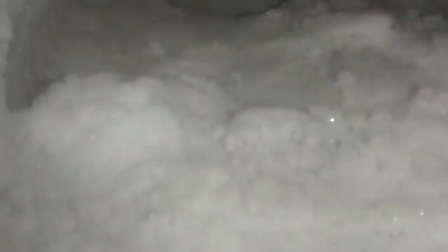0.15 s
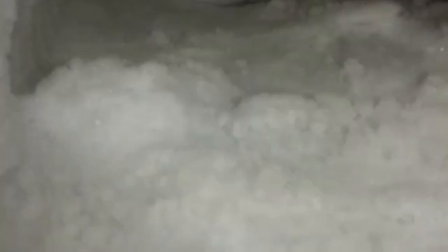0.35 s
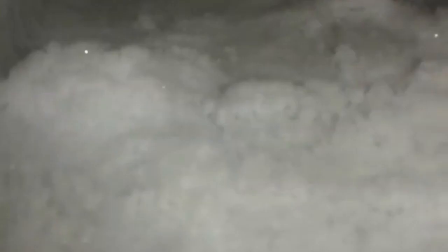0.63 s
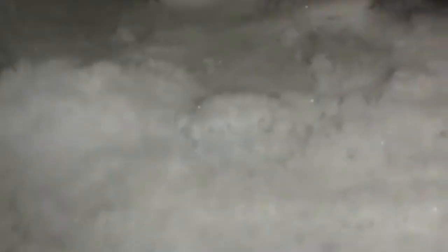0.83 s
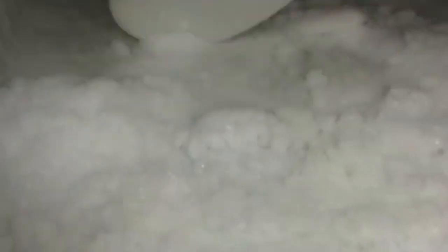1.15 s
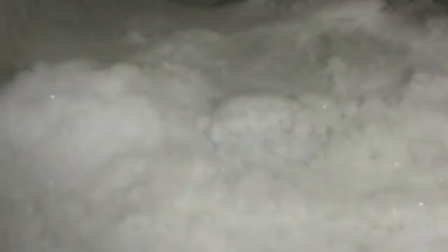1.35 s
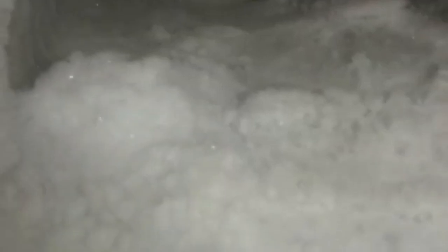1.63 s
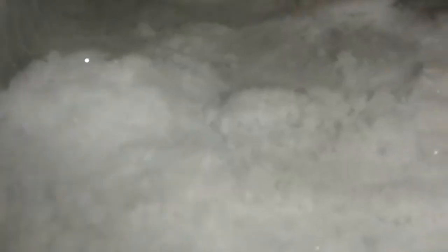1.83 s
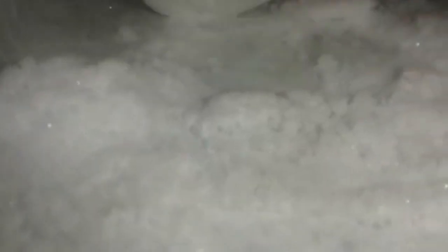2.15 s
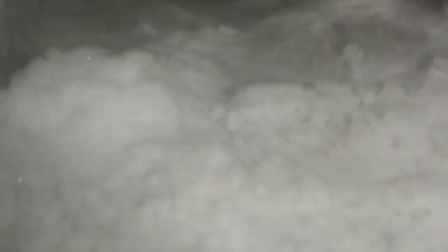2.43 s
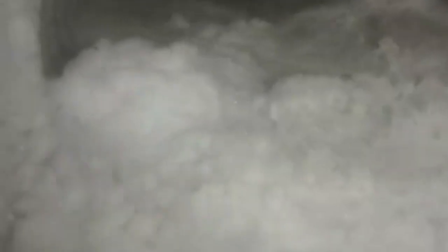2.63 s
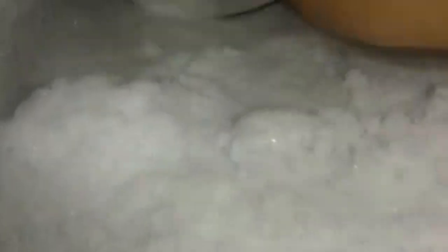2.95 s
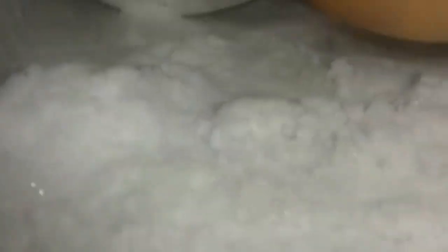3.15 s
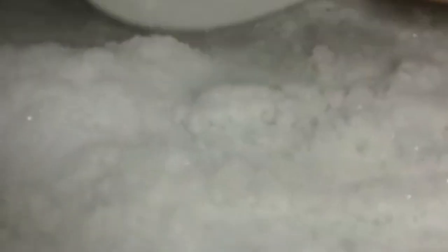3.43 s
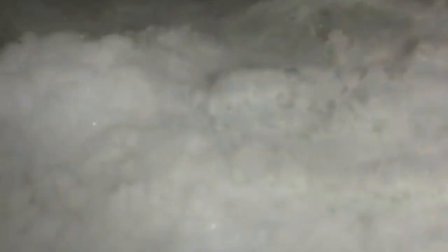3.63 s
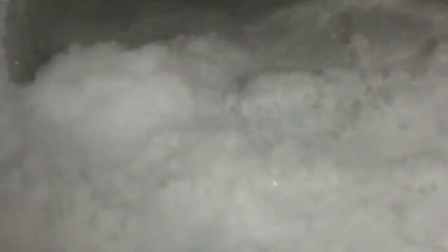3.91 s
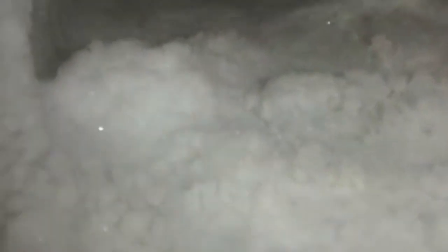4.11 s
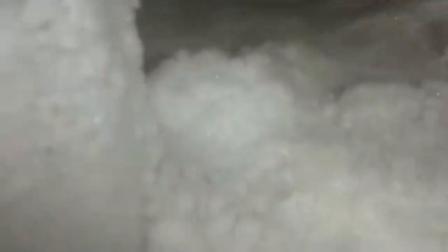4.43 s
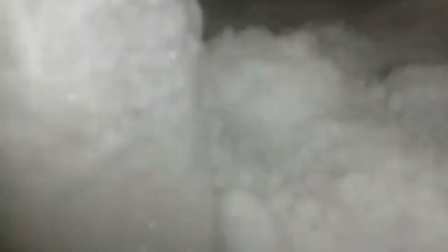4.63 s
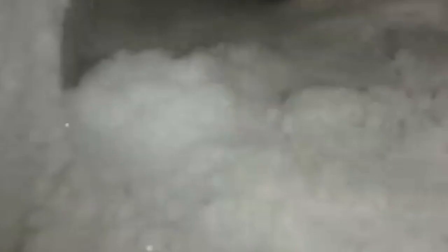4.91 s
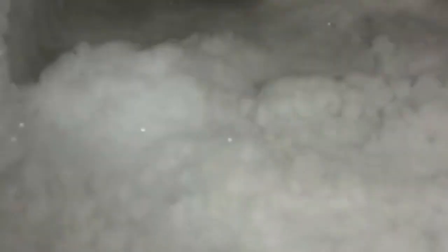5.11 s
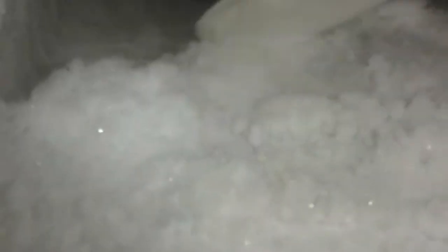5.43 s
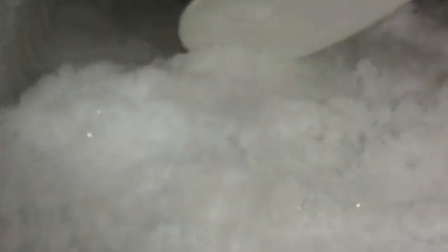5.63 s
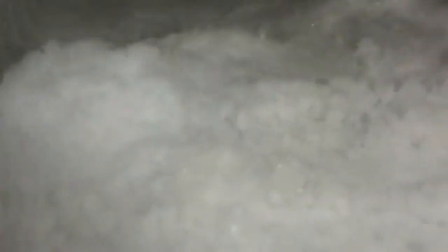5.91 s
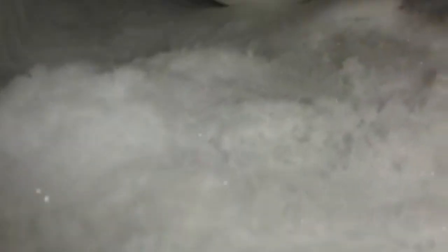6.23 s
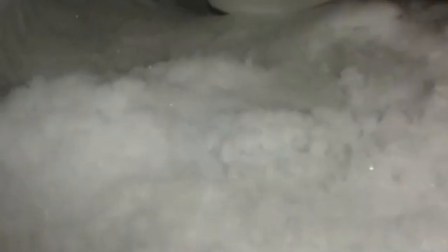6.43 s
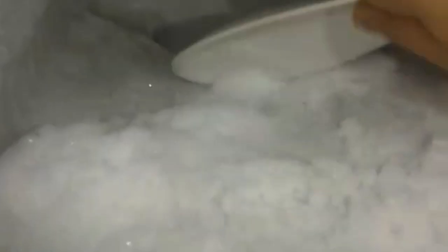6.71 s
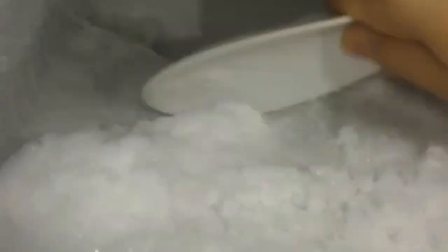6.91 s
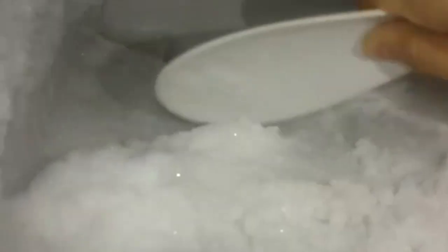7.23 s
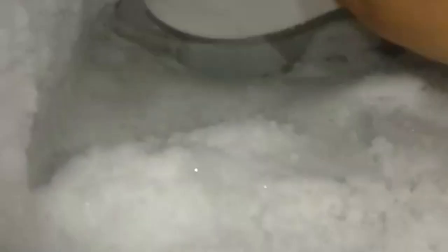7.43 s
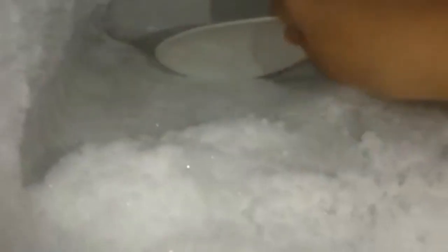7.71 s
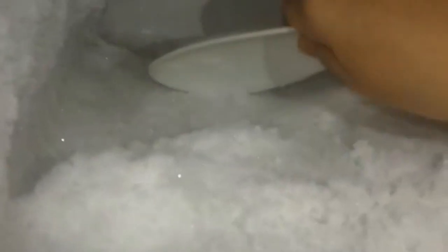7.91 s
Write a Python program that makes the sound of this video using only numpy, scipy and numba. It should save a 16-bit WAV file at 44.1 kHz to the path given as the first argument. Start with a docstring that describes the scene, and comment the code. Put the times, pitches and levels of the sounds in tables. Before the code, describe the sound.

Close inside a freezer, a thin plastic scraper works over thick frost. The tail of one stroke opens the scene, then a light scratch at 0.5 s leads into a gritty rasp from 0.7 to 1.2 s. Another long push runs 1.8-2.3 s, and a longer, rougher one 2.7-3.5 s with loud snaps near 3.0 and 3.2 s and a dull wall thump at its end. A short scrape at 3.9 s precedes a hollow flurry of small cracks from 4.0 to 4.7 s along the side wall. Firm strokes follow at 4.7-5.0 and 5.1-5.7 s. After a pause, jerky, brighter scraping with snaps fills 6.1-6.9 s, then short scratches around 7.0-7.3 s. From 7.7 s a last push crackles, its strongest break near 8.0 s. Crumbs trickle after strokes; low motor hum and rumble persist faintly, while a thin two-tone whistle fades by mid-scene.

```python
"""Scraping frost in a freezer

A thin plastic scraper is pushed over thick frost, stroke after stroke, close to the microphone.
Loose frost rasps as shaped noise; on hard ice the edge sticks, slips and snaps in bursts of fractures.
The freezer wall thumps in its low modes, near walls echo and the kitchen adds a faint tail.
Behind it: a low motor hum over rumble and drone, and a thin two-tone whistle that fades."""
import sys
import numpy as np
from scipy import signal
from scipy.fft import rfft, irfft, next_fast_len
from scipy.io import wavfile
from scipy.ndimage import uniform_filter1d, map_coordinates
from numba import njit

SR = 44100
rng = np.random.default_rng(int(sys.argv[2]) if len(sys.argv) > 2 else 0)


def inscribe(sig):
    """Save sig as 16-bit PCM at rate SR to the path in sys.argv[1].

    A 1-D sig is mono; a 2-D sig holds one channel per row.
    Samples are clipped to [-1, 1] before scaling.
    """
    pcm = np.round(np.clip(np.atleast_2d(sig).T, -1, 1) * 32767)
    wavfile.write(sys.argv[1], SR, pcm.astype(np.int16))


N = 355446
TIME = np.arange(N) / SR
SIZE = next_fast_len(N + SR, True)  # transform length, with room for tails
HZ = np.fft.rfftfreq(SIZE, 1 / SR)
TOP_HZ = 16000  # band limit

# the edge lands or breaks off a lump, levels ahead of the band trims:
# (time [s], middle level [dB], bass and treble relative to it [dB, dB])
SNAP_EVENTS = [(0.4904, -11.5, -9, 0.5), (0.5681, -12.5, -3.5, -2.5), (0.715, -20, 8, 12),
               (1, -3, -5.5, -17), (1.6133, -15, -4.5, 1), (1.765, -9, -6.5, -15), (2.6415, -20, 4, 16.5),
               (2.9744, 2.5, -10.5, -41), (3.2012, -2, -15, -1.5), (3.4993, -14, 4.5, 3),
               (4.006, -17, -7, 8.5), (4.0432, -16, -14, -2), (4.068, -8.5, -17, -20),
               (4.117, -9.5, -13, -5), (4.1822, -15.5, -18, 2.5), (4.2121, -11, -14, -3.5),
               (4.2622, -10.5, -4.5, 1), (4.3375, -11, -15, -6), (4.4429, -9.5, -2, -1.5),
               (4.5084, -10.5, -13, -11), (4.561, -19.5, -9, -1), (4.5942, -12.5, -11, -6.5),
               (4.6416, -21, -18, -6), (4.7239, -9, 1.5, -5), (5.0402, -9.5, -10, 0),
               (5.0689, -10.5, -9, -2.5), (5.1277, -7.5, -12, -4), (5.5009, -11.5, 3, -3),
               (5.5396, -11, 7.5, -20), (6.0835, -6, 4, -6), (6.127, -5, -14, -12),
               (6.1646, -3.5, -26, -7.5), (6.2249, -7, -17, -4), (6.3395, -2, -32, -7.5),
               (6.4752, -9.5, -22, -8), (6.8761, -8.5, -5, 5), (6.981, -18, -9, 8), (7.1742, -9.5, -19, 1),
               (7.2044, -10, -0.5, 3), (7.6881, -19, -8, 4), (7.8531, -7, -22, 0), (7.896, 0, -12, -4),
               (7.9405, 1.5, -14, -5.5), (7.985, -5, -2.5, -15), (8.0249, 10, -14, -4),
               (8.0456, -3, -13, 3)]
# pushes of the scraper: (start [s], end [s], level [dB], rise [s], bass and treble relative to it [dB, dB],
# stick-slip share [0-1], dig down to hard ice [0-1], lower and upper blade mode in mid-stroke [Hz, Hz])
PUSHES = [(-0.1, 0.1, -16, 0.025, -9.5, 3.5, 0.055, 0.39, 1470, 4150),
          (0.54, 0.684, -25.5, 0.063, -7.5, 1, 0.63, 0, 1770, 5370),
          (0.725, 1.244, -16, 0.032, -14.5, 2, 0.041, 0.83, 1590, 4460),
          (1.619, 1.643, -34, 0.0057, 1, 2, 0.4, 0, 1700, 5900),
          (1.694, 1.751, -29.5, 0.014, -9.5, 1.5, 0.3, 0.17, 1690, 5430),
          (1.768, 2.288, -15.5, 0.051, -12.5, 2, 0.21, 0.69, 1690, 4420),
          (2.628, 2.66, -24, 0.0043, -4.5, 3, 0.22, 0.077, 1720, 4260),
          (2.71, 2.785, -18, 0.026, -9.5, 1, 0.1, 0, 1530, 3880),
          (2.797, 3.515, -15.5, 0.081, -14, 1.5, 0.2, 0.94, 1470, 3580),
          (3.849, 3.862, -25, 0.005, -13, 3, 0.1, 0, 2120, 4340),
          (3.876, 3.951, -18, 0.076, -8, 5, 0.16, 0.056, 2200, 4640),
          (4.011, 4.167, -30.5, 0.032, -15, 5, 0.9, 0.024, 1900, 5240),
          (4.264, 4.37, -24, 0.0044, -15, 2.5, 0.7, 0.093, 1750, 5100),
          (4.394, 4.488, -30, 0.035, -9, 2, 0.7, 0.049, 1750, 4870),
          (4.527, 4.702, -49.5, 0.02, -7, 8, 0.7, 0.09, 1650, 4940),
          (4.717, 5.03, -17, 0.033, -12, 2.5, 0.31, 0.051, 1560, 3860),
          (5.05, 5.103, -41.5, 0.005, -4, 5, 0.6, 0.22, 1600, 4000),
          (5.137, 5.679, -16.5, 0.01, -13.5, 3, 0.16, 0.85, 1990, 3910),
          (6.083, 6.212, -27, 0.03, -8.5, 3.5, 0.75, 0, 2570, 4650),
          (6.228, 6.439, -16.5, 0.014, -15, 2.5, 0.35, 0.21, 2470, 4610),
          (6.42, 6.853, -17.5, 0.07, -10.5, 4, 0.15, 0.3, 2060, 4150),
          (6.976, 7.009, -16.5, 0.002, -11, 10.5, 0.2, 0.36, 1610, 4030),
          (6.993, 7.149, -18.5, 0.046, 0, 4, 0.51, 0, 1350, 3740),
          (7.203, 7.279, -24, 0.012, -8, 7, 0.14, 0.78, 1400, 3690),
          (7.685, 7.711, -27, 0.0027, -3.5, 1, 0.3, 0, 1510, 4000),
          (7.734, 8.06, -17.5, 0.012, -14.5, 0.5, 0.21, 0.11, 1510, 3890)]

RISE_DB, RELEASE_DB_PER_S = 16, 652  # a stroke starts this much softer, and stops this fast
CRUMBS_DB, CRUMBS_DB_PER_S = -30, 90  # loose frost trickles down afterwards
# the last stretch, on hard ice: weaker, with more bass and treble
DIG_S, DIG_LEVEL_DB, DIG_BASS_DB, DIG_TREBLE_DB = 0.14, -6, 21.5, 4
JERK_S, JERK_SHARE = 0.31, 0.69  # the edge starts to stick some time before that
LURCH_DB, LURCH_RATE = 2.5, 50  # the hand lurches while the edge sticks; knots a second
# the blade's modes sink and wander as the contact travels along its rim
SINK_OCTAVES_PER_S, WANDER_OCTAVES, WANDER_RATE = 0.36, 0.085, 14


def amp(db):
    """Decibels to gain."""
    return 10 ** (np.asarray(db) / 20)


def unit(x):
    """Scale to rms 1."""
    return x / np.sqrt(np.mean(x ** 2) + 1e-20)


def curves(rows):
    """One value per sample for each column after the time."""
    s, *cols = np.transpose(rows)
    return [np.interp(TIME, s, c) for c in cols]


def along(points, hz):
    """(Hz, value) points read on a log frequency axis."""
    f, v = np.transpose(points)
    return np.interp(np.log(hz + 1), np.log(f), v)


def wobble(rate):
    """A smooth random curve of rms 1 with rate knots a second."""
    knots = rng.standard_normal(N // 8)
    return unit(map_coordinates(knots, [TIME * rate], mode="wrap"))


def filtered(x, response):
    """x through a frequency response."""
    return irfft(rfft(x, SIZE) * response, SIZE)[:N]


def lifts(resonances):
    """The dB that a set of resonances adds at each frequency."""
    return sum(db / (1 + (2 * (HZ - hz) / width) ** 2) for hz, width, db in resonances)


def causal(gain):
    """The short impulse response, of energy 1, that rings only after it is struck."""
    # folding the cepstrum forward gives the minimum-phase response
    cepstrum = irfft(np.log(gain + 1e-6), SIZE)
    cepstrum[1:SIZE // 2] *= 2
    cepstrum[SIZE // 2:] = 0
    ring = irfft(np.exp(rfft(cepstrum)), SIZE)[:SR // 20]
    return ring / np.linalg.norm(ring)


def add(track, s, sound):
    """Mix a sound in at time s."""
    part = track[max(0, round(s * SR)):][:len(sound)]
    part += sound[:len(part)]


def background(rumble_db=-1, hum_db=-7, whistle_db=-3, waver_db=5.0, drone_db=-56):
    """A motor hums over a rumble and a deep drone; two close thin tones whistle and flicker."""
    # slow level curves: (time [s], rumble and hum level [dB], whistle level [dB]), ahead of the gains above
    idle_levels = [(0.3, -36.5, -40), (1.5, -36.5, -51.5), (2.5, -37, -52.5), (3.7, -35.5, -46.5),
                   (4.7, -39, -72), (6.0, -40.5, -79), (7.5, -43, -96)]
    # colour of the background rumble: (frequency [Hz], density [dB per Hz])
    rumble_colour = [(25, -36), (135, 0.5), (250, -4.5), (430, -5.5), (700, -15.5), (900, -12),
                     (1600, -21.5), (4200, -27.5), (7000, -41), (15500, -44.5)]
    idle_db, thin_db = curves(idle_levels)

    def tone(hz, drift):
        """A sine whose phase drifts."""
        return np.sin(2 * np.pi * hz * TIME + drift)

    rumble = unit(filtered(rng.standard_normal(N), amp(along(rumble_colour, HZ))))
    drone = unit(filtered(rng.standard_normal(N), np.exp(-((HZ - 85) / 32) ** 2)))
    hum = sum(tone(hz, wobble(9.9)) for hz in (130, 170))
    whistle = sum(amp(db + waver_db * wobble(48)) * tone(hz, wobble(40))
                  for hz, db in ((2800, -1), (2905, 0)))
    low = amp(idle_db) * (amp(rumble_db) * rumble + amp(hum_db) * hum)
    return low + amp(drone_db) * drone + amp(thin_db + whistle_db) * whistle


def compartment(x, echo=0.16, travel=.00005, room_db=-19, room_t60=0.45):
    """Near walls echo with delays that drift as the scraper moves; the kitchen adds a faint tail."""
    # echoes from the near walls of the compartment: (mean delay [s])
    echo_delays = [0.0013, 0.0021, 0.0031, 0.0043, 0.0056]
    near = x.copy()
    for delay in echo_delays:
        heard_from = TIME - delay - travel * wobble(3)
        near += echo * np.interp(heard_from, TIME, x, left=0)
    t = np.arange(SR // 2) / SR
    dull = signal.lfilter(*signal.butter(1, 6000 / (SR / 2)), rng.standard_normal(len(t)))
    tail = dull * amp(-60 * t / room_t60)
    return near + amp(room_db) * signal.oaconvolve(x, tail / np.linalg.norm(tail))[:N]


def thumps(gain_db=1, attack=0.00574):
    """The wall gives and booms in its low modes, with new strengths and pitches each time."""
    # the freezer wall gives and springs back: (time [s], level ahead of gain_db [dB])
    thump_events = [(0.116, -23.5), (0.499, -25.5), (1.238, -25), (1.635, -21), (2.281, -19), (2.643, -16),
                    (3.507, -20), (4.445, -22.5), (4.731, -22.5), (4.915, -21.5), (5.043, -15),
                    (5.547, -26), (6.09, -22.5), (7.059, -20), (7.693, -23)]
    # modes of the wall, before each thump's scatter: (frequency [Hz], level [dB], t60 [s])
    wall_modes = [(189.3, -1, 0.13), (262, -1, 0.093)]
    out, t = np.zeros(N), np.arange(SR // 2) / SR
    for s, db in thump_events:
        ring = np.zeros(len(t))
        for hz, level, t60 in wall_modes:
            decay = amp(level + rng.normal(0, 1.0) - 60 * t / t60)
            ring += decay * np.sin(2 * np.pi * hz * (1 + rng.normal(0, 0.058)) * t)
        ring *= 1 - np.exp(-t / attack)
        # the level is that of the first 25 ms
        add(out, s - attack, amp(db + gain_db) * ring / np.std(ring[:SR // 40]))
    return out


def current_stroke():
    """For every sample, the columns of the stroke that began last."""
    rows = np.array(PUSHES)
    return rows[np.maximum(np.searchsorted(rows[:, 0], TIME) - 1, 0)].T


def nearing(end, span):
    """A bell over time that swells to 1 at the end of a stroke; span in seconds."""
    return np.exp(-((TIME - end) / span) ** 2)


def bite():
    """Bass dB, treble dB and stick-slip share: a stroke turns jerky, then deep, as it reaches hard ice."""
    _, end, _, _, bass_db, treble_db, jerky, dig, _, _ = current_stroke()
    ice = dig * nearing(end, DIG_S)
    jerky = jerky + JERK_SHARE * dig * nearing(end, JERK_S)
    return bass_db + DIG_BASS_DB * ice, treble_db + DIG_TREBLE_DB * ice, np.clip(jerky, 0, 1)


def pressure(hold=0.0069, stick_share=0.57):
    """Gain of the rasp: each stroke rises, holds, weakens on the ice and stops in a trickle of crumbs."""
    gain = np.zeros(N)
    for start, end, db, rise, _, _, _, dig, _, _ in PUSHES:
        risen = np.clip((TIME - start) / rise, 0, 1)
        after = np.maximum(TIME - end, 0)
        # the weakening stays in force once the stroke has ended
        ice = dig * nearing(np.maximum(end, TIME), DIG_S)
        push_db = db - RISE_DB * (1 - risen) + DIG_LEVEL_DB * ice
        release_db = np.maximum(-RELEASE_DB_PER_S * after, CRUMBS_DB - CRUMBS_DB_PER_S * after)
        gain = np.maximum(gain, (TIME >= start) * amp(push_db + release_db))
    _, _, jerky = bite()
    gain *= amp(LURCH_DB * jerky * wobble(LURCH_RATE))
    # the edge sticks, and the rasp sinks, for a moment before each snap
    at = np.sort(np.array(SNAP_EVENTS)[:, 0])
    to_snap = np.append(at, np.inf)[np.searchsorted(at, TIME)] - TIME
    return gain * (1 - stick_share * np.exp(-(to_snap / hold) ** 2))


def stick_slip(rate=90, scatter=.35, size_db=4.0, life=0.0011):
    """Power that swells and dies as the edge lets go at uneven intervals, levelled by its running mean."""
    wait_chance, size_chance = rng.standard_normal((3000, 2)).T
    wait = np.exp(scatter * wait_chance) / rate
    at = (np.cumsum(wait) * SR).astype(int)
    # a longer hold stores more energy
    energy = wait * amp(size_db * size_chance) ** 2
    power = np.bincount(at[at < N], energy[at < N], N)
    # two equal decays in a row round off the onset
    for _ in range(2):
        power = signal.lfilter([1], [1, -np.exp(-1 / (life * SR))], power)
    return power / (np.abs(uniform_filter1d(power, SR // 20)) + 1e-9)


def scraper_rings(bass_hz=1100, treble_hz=2800):
    """The scraper's answer to one breaking crystal, split into bass, middle and treble."""
    # resonances of the scraper: (frequency [Hz], width [Hz], lift [dB])
    scraper_modes = [(530, 260, 7), (963, 97, 2), (1032, 81, -5), (1250, 87, 6), (2500, 110, 2),
                     (2650, 240, -3), (3200, 180, 1), (3710, 650, 3.5), (4500, 380, 1.5), (6040, 420, 3.5),
                     (7280, 600, 4.5)]
    # colour of crushed frost: (frequency [Hz], density [dB per Hz])
    frost_colour = [(40, -14), (120, -11.5), (220, 2.5), (340, -5), (800, -3.5), (1600, -1.5), (5000, -3.5),
                    (6700, -10.5), (10000, -13.5), (15500, -23.5)]
    body = amp(along(frost_colour, HZ) + lifts(scraper_modes))
    bass, below_treble = (1 / (1 + (HZ / edge) ** 10) for edge in (bass_hz, treble_hz))
    shares = (bass, (1 - bass) * below_treble, 1 - below_treble)
    return [causal(body * np.sqrt(share)) for share in shares]


def rasp(rings, grain_db=1.5, lump_db=1, trim_db=(0, -2.3, -1.5)):
    """Crystals crumble under the edge, evenly in soft frost and in jerks on hard ice."""
    bass_db, treble_db, jerky = bite()
    texture = unit(amp(grain_db * wobble(2200) + lump_db * wobble(170)))
    flow = np.sqrt(1 - jerky + jerky * stick_slip()) * texture
    force = pressure() * flow
    out = np.zeros(N)
    for ring, db, trim in zip(rings, (bass_db, 0, treble_db), trim_db):
        crystals = force * amp(db + trim) * rng.standard_normal(N)
        out += signal.oaconvolve(crystals, ring)[:N]
    return out


def snaps(rings, t60=0.017, crumble_db=-22, crumble_t60=0.053, trim_db=(-5, -8, -7)):
    """Each snap is a burst of fractures, followed by a little crumbling."""
    out, t = np.zeros(N), np.arange(SR // 16) / SR
    fall = amp(-60 * t / t60) + amp(crumble_db - 60 * t / crumble_t60)
    for s, db, bass_db, treble_db in SNAP_EVENTS:
        for ring, band_db, trim in zip(rings, (bass_db, 0, treble_db), trim_db):
            burst = signal.fftconvolve(fall * rng.standard_normal(len(t)), ring)
            # the level is that of the first 5 ms
            add(out, s, amp(db + band_db + trim) * burst / np.std(burst[:SR // 200]))
    return out


@njit
def resonator(x, step, damping):
    """A band-pass whose centre moves; step is about its phase advance per sample, in radians."""
    out, low, band = np.zeros(len(x)), 0.0, 0.0
    for i in range(len(x)):
        low += step[i] * band
        band += step[i] * (x[i] - low - damping * band)
        out[i] = damping * band
    return out


def blade_modes():
    """The blade's two bending modes in Hz, sinking and wandering through each stroke."""
    start, end, *_, lower_hz, upper_hz = current_stroke()
    sink = SINK_OCTAVES_PER_S * (np.minimum(TIME, end) - (start + end) / 2)
    return [hz * 2 ** (WANDER_OCTAVES * wobble(WANDER_RATE) - sink) for hz in (lower_hz, upper_hz)]


def blade(x, lower_damping=0.18, upper_damping=0.032):
    """The blade rings in its two bending modes; a wave sent back from its rim adds gliding hollows."""
    lower_hz, upper_hz = blade_modes()
    lower = resonator(x, 2 * np.sin(np.pi * lower_hz / SR), lower_damping)
    upper = resonator(x, 2 * np.sin(np.pi * upper_hz / SR), upper_damping)
    bent = x + 1.3 * lower + upper
    # the wave returns inverted, after two and a half cycles of the upper mode
    return bent - .2 * np.interp(TIME - 2.5 / upper_hz, TIME, bent)


def side_wall(x):
    """While the scraper works along the side wall, all its sound rings hollow."""
    # hollow colour at the side wall: (frequency [Hz], width [Hz], lift [dB])
    hollow_modes = [(1048, 210, 15.5), (1806, 210, 9), (2500, 270, -8), (5100, 2600, 5)]
    # when the scraper works there: (start [s], end [s])
    side_span = (3.98, 4.7)
    start, end = side_span
    touching = uniform_filter1d(1. * ((TIME > start) & (TIME < end)), SR // 50)
    hollow = signal.oaconvolve(x, causal(amp(lifts(hollow_modes))))[:N]
    return x + touching * (hollow - x)


def scene():
    """Scraper and wall sound inside the compartment, over the background."""
    rings = scraper_rings()
    scraping = side_wall(blade(rasp(rings) + snaps(rings)))
    return (amp(-3.0) * compartment(scraping + thumps()) + background())[None]


def record(dry):
    """The loudest peaks clip softly, and nothing is kept above the band limit."""
    clipped = dry[0] / (1 + np.abs(dry[0]) ** 6) ** (1 / 6)
    return filtered(clipped, HZ < TOP_HZ)[None]


dry = scene()
out = record(dry)
inscribe(out)
```